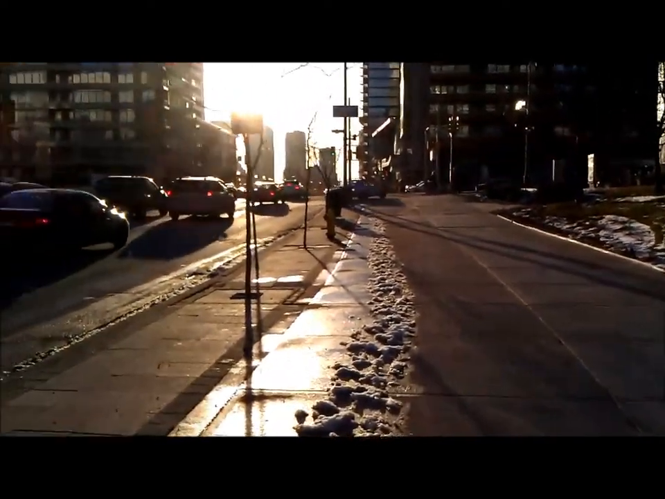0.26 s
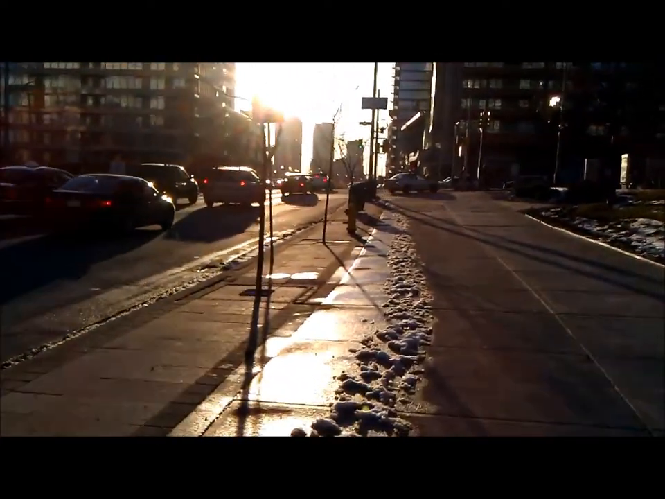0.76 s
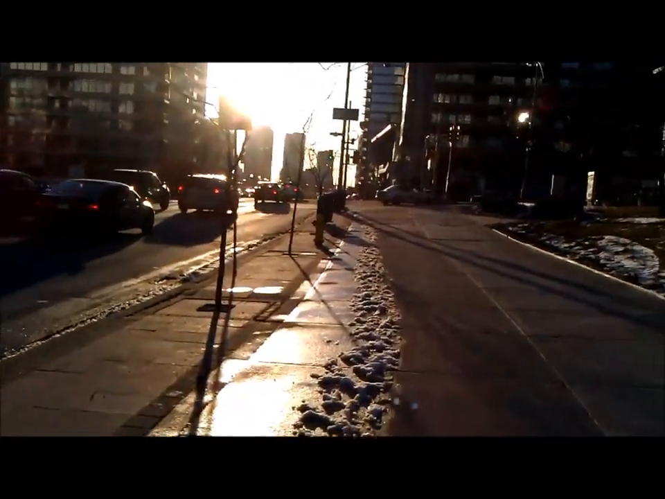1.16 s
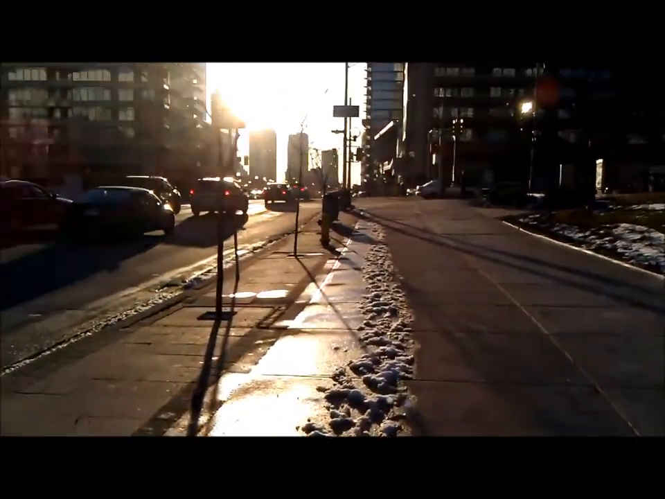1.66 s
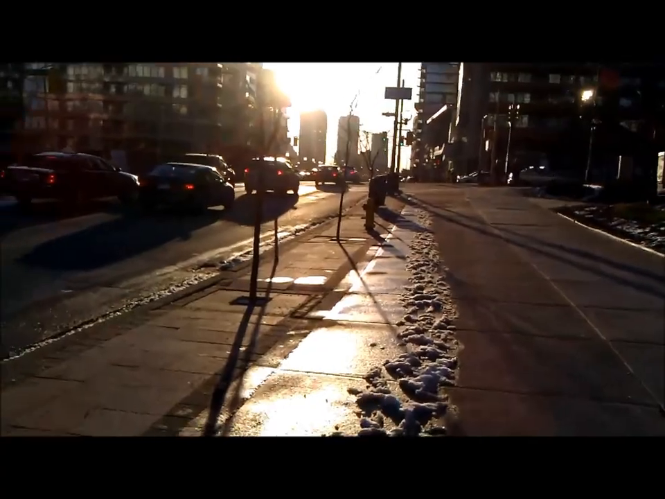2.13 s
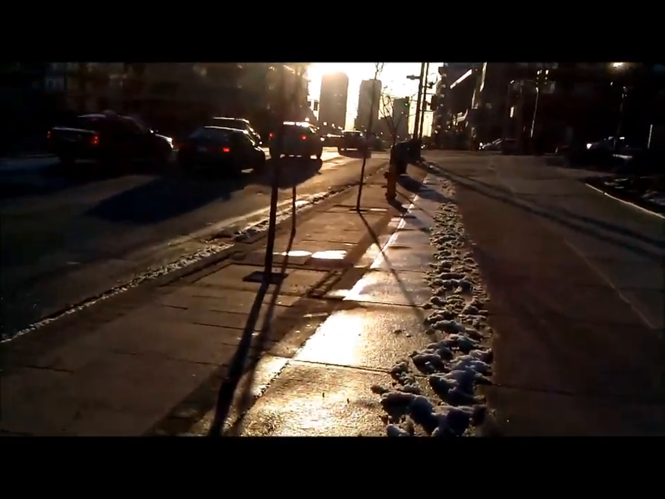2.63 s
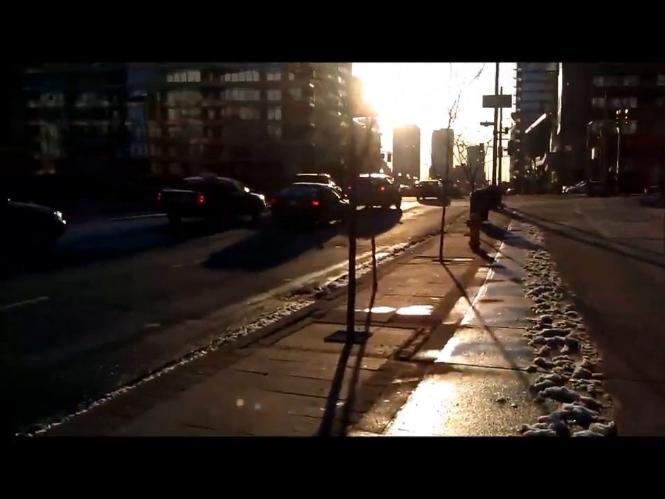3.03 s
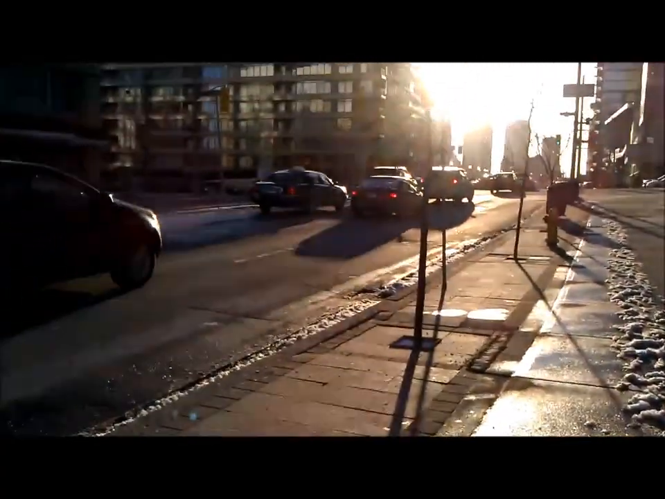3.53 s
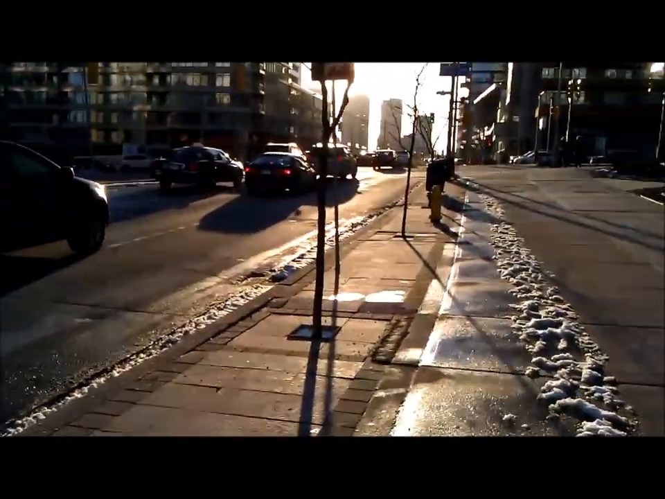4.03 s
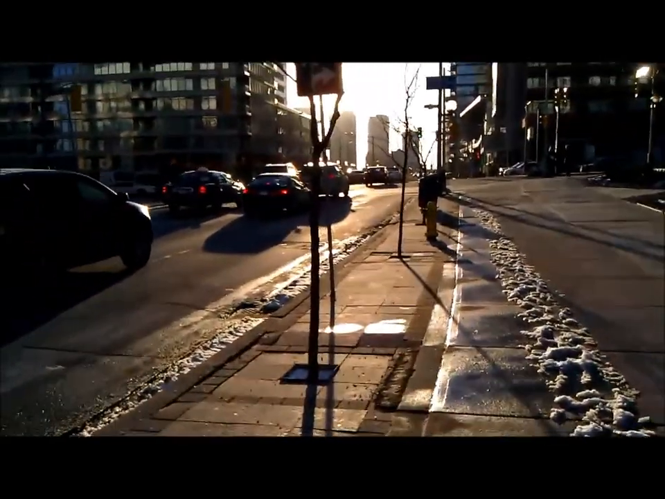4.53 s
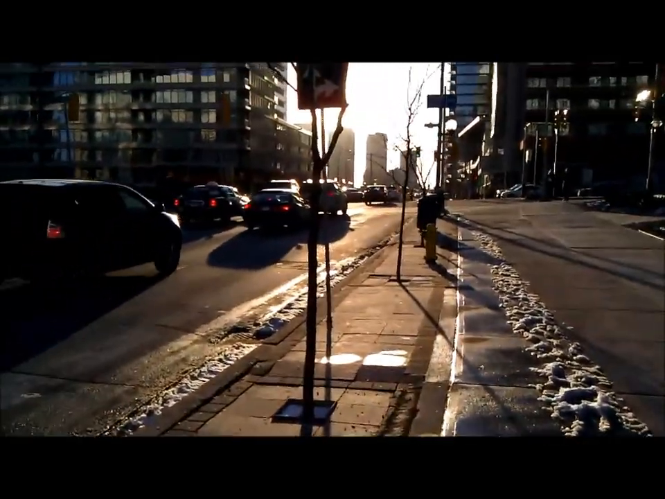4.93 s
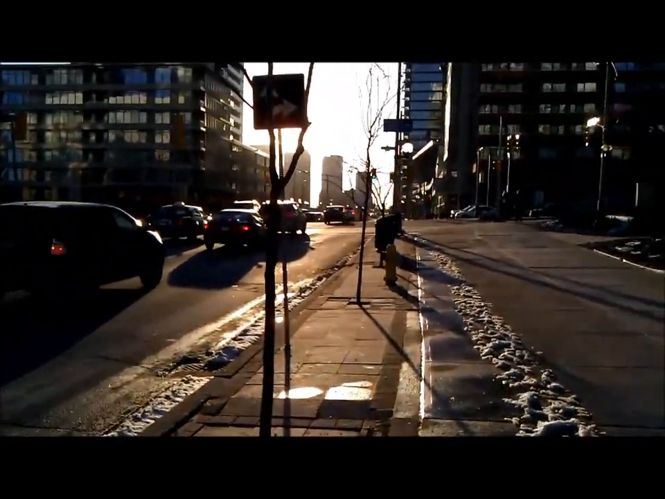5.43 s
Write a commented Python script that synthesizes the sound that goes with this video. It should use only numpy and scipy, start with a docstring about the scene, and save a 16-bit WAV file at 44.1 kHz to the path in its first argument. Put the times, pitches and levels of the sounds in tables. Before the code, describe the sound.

Tyres hiss on a wet city street over distant traffic rumble, passes crowding together as a near car sweeps by around five seconds.

```python
"""A wet city street from the pavement, one microphone facing the cars: traffic rumbles far down the road throughout.
Two tyre passes hiss by in the first second, a broader one at 2.7 s; a distant engine drones and recedes.
From 4 s the passes crowd together; the nearest car is alongside at about 5.1 s, its roar and engine rising.
Spray is coloured noise and droplets whose level follows distance; tread and city are noise, engines are sines.
Now and then wind nudges the microphone (short low swells) and grit ticks (short bursts in one band)."""
import sys
import numpy as np
from scipy import signal
from scipy.fft import rfft, irfft, next_fast_len
from scipy.io import wavfile
from scipy.ndimage import map_coordinates

SR = 44100
rng = np.random.default_rng(int(sys.argv[2]) if len(sys.argv) > 2 else 0)


def wav_record(signal):
    """Record a signal, one row per channel, as 16-bit PCM in the file named by sys.argv[1]."""
    frames = np.transpose(np.atleast_2d(signal))
    bounded = np.clip(frames, -1, 1)
    # unit amplitude maps onto the largest positive 16-bit level
    quanta = np.round(bounded * 32767).astype(np.int16)
    wavfile.write(sys.argv[1], SR, quanta)


N = 250387
TIME = np.arange(N) / SR  # s

# spectrum of traffic far down the street: f/Hz, relative level/dB
CITY_SPECTRUM = [(10, -2.5), (25, 0), (45, -1.5), (80, -3.5), (130, -6.5), (240, -5.5), (330, -8.5),
                 (450, -10.5), (620, -20), (730, -13), (870, -8.5), (1100, -13), (1500, -14.5),
                 (3000, -24.5), (8000, -47.5)]
# engine of the approaching car, gently speeding up: t/s, mean firing rate f/Hz, mean level/dB
NEAR_ENGINE = [(0, 50, -60.5), (3.2, 54.68, -37), (3.35, 55.03, -29.5), (4.5, 57.93, -33.5),
               (4.9, 61.4, -40), (5.45, 63, -31.5), (5.68, 65, -42)]
# harmonics of its firing rate: multiple, relative level/dB
FIRING_ORDERS = [(1, 1.5), (2, -14.5), (3, -16.5), (4, -13)]
# wind buffets at the microphone: t/s of the middle, level/dB, half length/s, upper edge f/Hz
WIND_BUFFETS = [(1.31, -42, 0.031, 59), (1.78, -28, 0.089, 35), (1.902, -29.5, 0.047, 333),
                (1.996, -19.5, 0.015, 437), (2.162, -22.5, .014, 130), (2.374, -18, 0.026, 190),
                (2.46, -13, 0.0048, 200), (2.834, -28.5, 0.079, 140), (4.472, -24, 0.054, 150),
                (4.62, -26, 0.023, 100)]
# grit and splashes under the tyres: t/s of the start, level/dB, centre f/Hz, width f/Hz, rise/s
GRIT_TICKS = [(0.043, -20, 2100, 900, 0.0013), (1.308, -16, 5900, 1200, 0.002),
              (1.984, -21, 5600, 1790, 0.0088), (2.79, -14, 1630, 450, 0.00085),
              (2.837, -15, 5400, 2000, 0.0011), (4.737, -25, 350, 350, 0.0015),
              (5.161, -10, 3900, 2870, 0.0026), (5.394, -16, 730, 476, 0.0027),
              (5.495, -16.5, 4780, 2980, .006)]
# tread roar as the nearest car draws level: t/s, level/dB before the trim in tread()
TREAD_LEVEL = [(0, -29), (3.7, -24.5), (5.0, -21.5), (5.35, -19), (5.68, -18.5)]
# spectrum of tread on asphalt: f/Hz, relative level/dB
TREAD_SPECTRUM = [(25, -17), (70, -3.5), (130, 0), (280, 1), (550, -1.5), (900, 0.5), (1400, 1.5),
                  (2100, 4), (3000, -1.5), (4500, -0.5), (7000, -18), (8000, -19)]
# tyres passing through water: t/s when loudest, level/dB before the trim in spray(),
# approach/s, retreat/s, lift of the lower hiss/dB when level with the microphone
TYRE_PASSES = [(0.47, -20.5, 0.21, 0.13, -2.5), (0.75, -15.5, 0.16, .46, -0.1),
               (2.74, -14.5, 0.56, 0.82, -0.24), (4.021, -17.5, 0.12, 0.15, .8), (4.71, -19.5, .16, .12, 4),
               (5.11, -9.5, 0.21, 0.4, -2), (5.49, -13, 0.12, .04, -7.5)]
# spectrum of spray before the lifts in spray(): f/Hz, relative level/dB
SPRAY_SPECTRUM = [(500, -34), (1500, -23.5), (2400, -11.5), (3100, -7), (3900, -7.5), (4500, -5.5),
                  (5100, -4), (5600, -0.85), (5950, 0), (6400, -2), (6800, -6), (7300, -10), (7700, -21.5),
                  (8100, -36)]


def amp(db):
    """Decibels to gain."""
    return 10 ** (np.asarray(db) / 20)


def unit(x):
    """Scales to rms 1."""
    return x / np.sqrt(np.mean(x ** 2) + 1e-20)


def follow(rows):
    """The columns of a curve table at every sample."""
    t, *columns = np.transpose(rows)
    return [np.interp(TIME, t, column) for column in columns]


def colour(x, spectrum):
    """Filters by a spectrum drawn on a log-frequency axis, to rms 1."""
    hz, db = np.transpose(spectrum)
    size = next_fast_len(N)
    bins_hz = np.fft.rfftfreq(size, 1 / SR)
    gain = amp(np.interp(np.log(bins_hz + 1), np.log(hz), db))  # + 1 avoids log(0)
    return unit(irfft(rfft(x, size) * gain, size)[:N])


def below(x, hz):
    """The part of a sound under a frequency, without delay."""
    return signal.sosfiltfilt(signal.butter(4, hz, fs=SR, output="sos"), x)


def wander(rate):
    """Smooth chance of rms 1, with rate random knots a second."""
    knots = rng.standard_normal(4096)
    return unit(map_coordinates(knots, [TIME * rate], order=3, mode="wrap"))


def patchy(x, depth_db, size, frame):
    """Lets patches of size (bins, frames) swell and fade on their own; frame is in samples."""
    overlap = frame * 3 // 4
    z = signal.stft(x, nperseg=frame, noverlap=overlap)[2]
    blur = np.outer(np.hanning(size[0]), np.hanning(size[1]))
    patches = unit(signal.fftconvolve(rng.standard_normal(z.shape), blur, "same"))
    varied = signal.istft(z * amp(depth_db * patches), nperseg=frame, noverlap=overlap)[1]
    return unit(varied[:N])


def city(start_db=-28, growth_db=1, unrest_db=2.16):
    """Traffic far down the street: an uneven rumble that slowly builds, with a hump of distant tyres."""
    din = patchy(rng.standard_normal(N), unrest_db, size=(4, 24), frame=4096)
    return amp(start_db + growth_db * TIME / TIME[-1]) * colour(din, CITY_SPECTRUM)


def far_engine(hz=185.5, start_db=-39, fade_db_per_s=2.8, waver=0.0085, throb_db=1.5):
    """A farther engine's thin drone: one sine of wavering pitch that slowly recedes."""
    turns = np.cumsum(hz * (1 + waver * wander(rate=12))) / SR
    drone = unit(np.sin(2 * np.pi * turns))
    level_db = start_db - fade_db_per_s * TIME
    return drone * amp(level_db + throb_db * wander(rate=8.5))


def near_engine(waver=0.0249, throb_db=2.5):
    """The near car's low firing orders: sines at multiples of an unsteady firing rate."""
    hz, level_db = follow(NEAR_ENGINE)
    turns = np.cumsum(hz * (1 + waver * wander(rate=14))) / SR
    hum = np.zeros(N)
    for multiple, order_db in FIRING_ORDERS:
        hum += amp(order_db) * np.sin(2 * np.pi * multiple * (turns + rng.random()))
    return unit(hum) * amp(level_db + throb_db * wander(rate=24))


def wind():
    """Each eddy at the microphone is a short swell of low turbulence."""
    out = np.zeros(N)
    for t, db, half, top_hz in WIND_BUFFETS:
        swell = np.exp(-0.5 * ((TIME - t) / half) ** 2)
        band = signal.butter(3, [12, top_hz], "band", fs=SR, output="sos")
        eddy = swell * signal.sosfilt(band, rng.standard_normal(N))
        out += amp(db) * eddy * np.linalg.norm(swell) / np.linalg.norm(eddy)
    return out


def ticks():
    """Each grit tick is a burst in one band that swells and dies at once."""
    out = np.zeros(N)
    t = np.arange(4096) / SR
    bins_hz = np.fft.rfftfreq(len(t), 1 / SR)
    for start, db, hz, width, rise in GRIT_TICKS:
        envelope = t / rise * np.exp(1 - t / rise)
        band = np.exp(-((bins_hz - hz) / width) ** 2)
        burst = envelope * irfft(rfft(rng.standard_normal(len(t))) * band)
        burst *= amp(db) * np.linalg.norm(envelope) / np.linalg.norm(burst)
        part = out[round(start * SR):][:len(t)]  # a view, cut at the end of the scene
        part += burst[:len(part)]
    return out


def tread(trim_db=-0.68):
    """Tread blocks slap the asphalt in a broad roar that grows as a car nears."""
    roar = patchy(rng.standard_normal(N), depth_db=0.77, size=(7, 24), frame=2048)
    near_db, = follow(TREAD_LEVEL)
    return amp(near_db + trim_db) * colour(roar, TREAD_SPECTRUM)


def passing(falloff=1.24, far_db=-29.5, trail_lift_db=0.5):
    """Passes swell and fade with distance: level of all spray/dB and lift of its lower hiss/dB."""
    t, db, approach, retreat, lift_db = np.transpose(TYRE_PASSES)[:, :, None]
    along = (TIME - t) / np.where(TIME < t, approach, retreat)  # relative place along the street
    power = amp(db) ** 2 / (1 + along ** 2) ** falloff
    total = power.sum(0) + amp(far_db) ** 2  # with the steady hiss of cars farther off
    coarse_db = lift_db + trail_lift_db * np.tanh(along)  # thin ahead of a car, coarser behind it
    return 10 * np.log10(total), (power * coarse_db).sum(0) / total


def droplets(drops_per_s=2500, spread_db=2.5):
    """Scattered droplets: single-sample clicks of random sign and size, to rms 1."""
    sizes = amp(spread_db * np.minimum(rng.exponential(1, N), 5)) * rng.choice([-1, 1], N)
    return unit(sizes * (rng.random(N) < drops_per_s / SR))


def spray(trim_db=-2.0, drop_share=0.13, flutter_db=0.4, coarse_hz=4700, fine_hz=6600, brighten=0.29):
    """Fine mist (noise) and larger droplets leave the treads in uneven sheets."""
    mist = rng.standard_normal(N)
    water = np.sqrt(drop_share) * droplets() + np.sqrt(1 - drop_share) * mist  # shares of power
    water = patchy(water, depth_db=0.7, size=(14, 9), frame=256)  # brief sheets of water
    water = patchy(water, depth_db=1.24, size=(7, 52), frame=2048)  # shifting echoes off car bodies
    hiss = colour(water, SPRAY_SPECTRUM)
    near_db, lift_db = passing()
    coarse = (amp(lift_db) - 1) * below(hiss, coarse_hz)
    top_db = brighten * (near_db - near_db.mean())  # near spray keeps its top
    fine = (amp(top_db) - 1) * (hiss - below(hiss, fine_hz))
    level_db = near_db + trim_db + flutter_db * wander(rate=60)
    return amp(level_db) * unit(hiss + coarse + fine)


def scene():
    """The whole street at one point, alike in both channels."""
    background = city() + far_engine() + near_engine() + wind() + ticks()
    street = background + tread() + spray()
    return np.array([street, street])


def record(dry, edge_hz=8050):
    """A narrow-band recorder: clips at full scale, then cuts the treble above the edge."""
    lowpass = signal.firwin(401, edge_hz, window=("kaiser", 9), fs=SR)
    return signal.oaconvolve(np.clip(dry, -1, 1), lowpass[None], "same")


dry = scene()
out = record(dry)
wav_record(out)
```